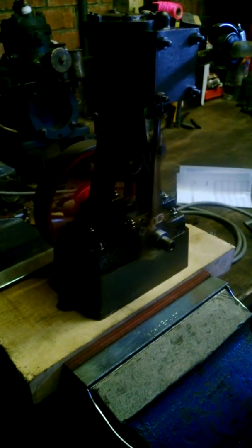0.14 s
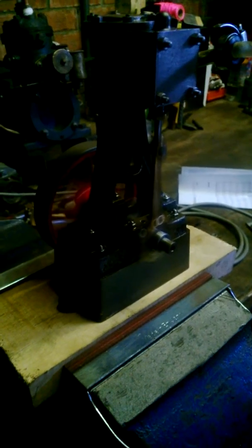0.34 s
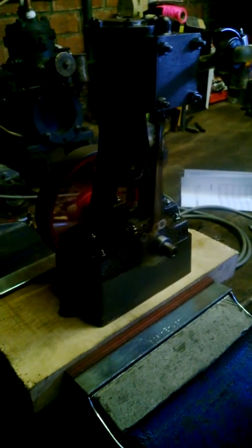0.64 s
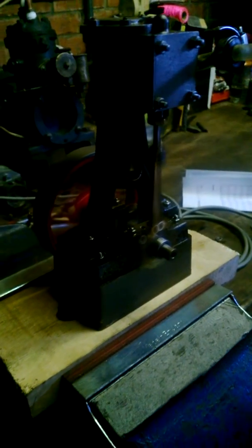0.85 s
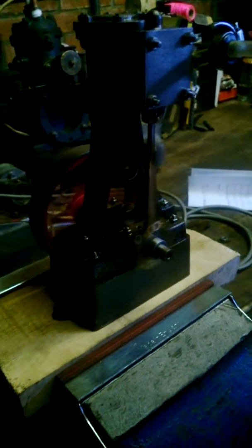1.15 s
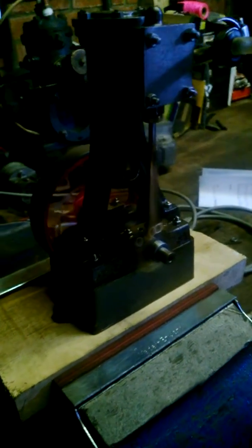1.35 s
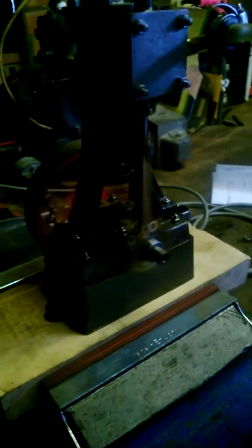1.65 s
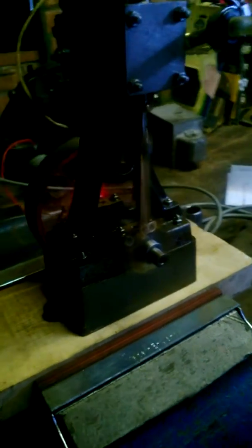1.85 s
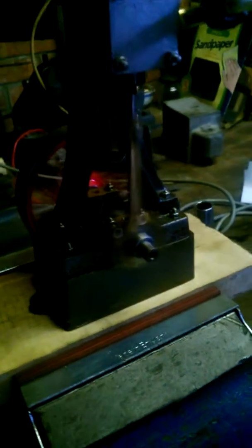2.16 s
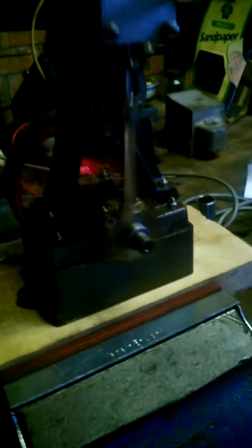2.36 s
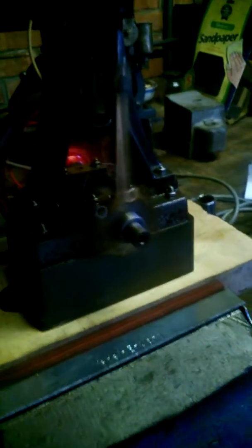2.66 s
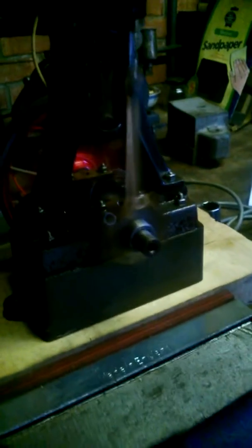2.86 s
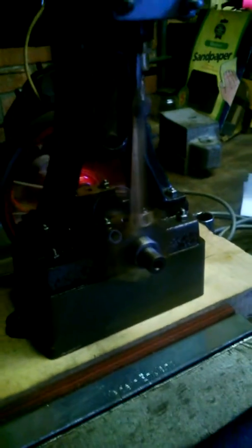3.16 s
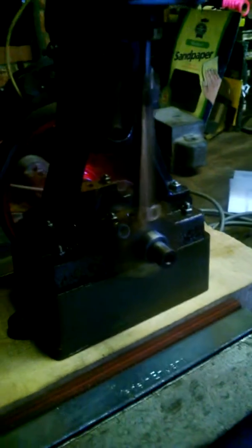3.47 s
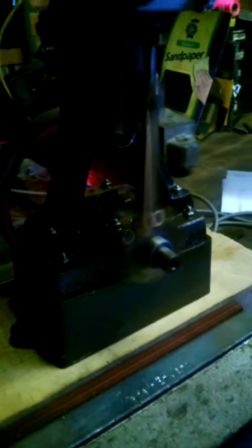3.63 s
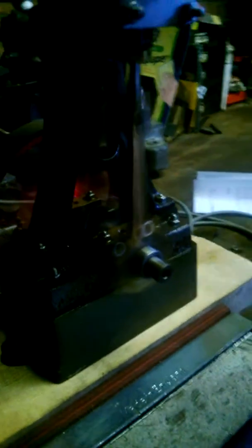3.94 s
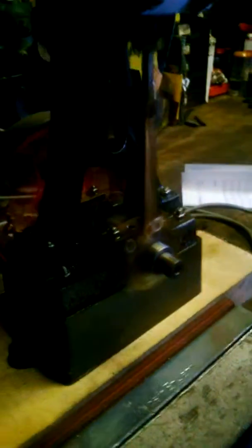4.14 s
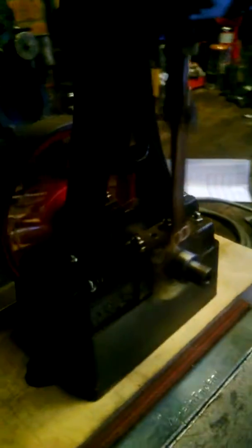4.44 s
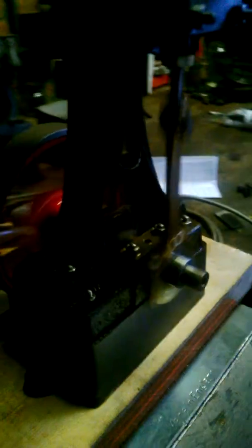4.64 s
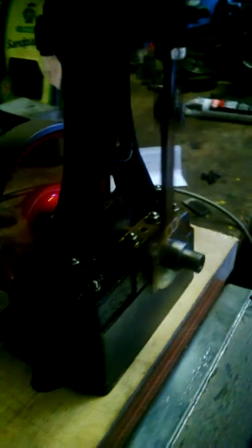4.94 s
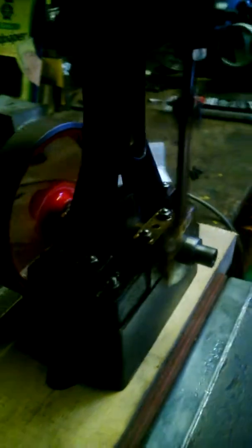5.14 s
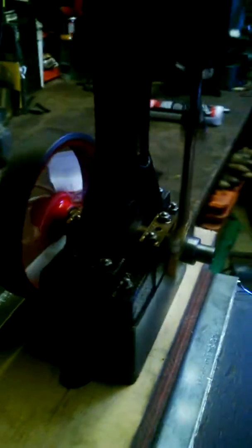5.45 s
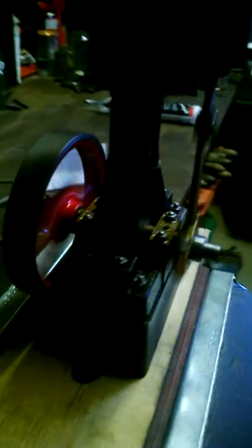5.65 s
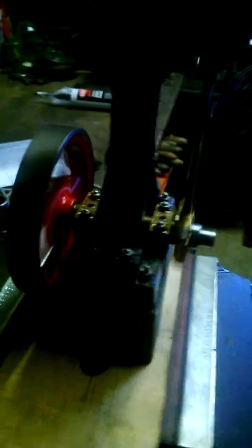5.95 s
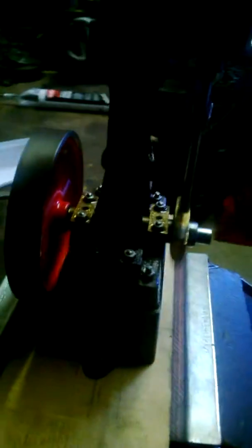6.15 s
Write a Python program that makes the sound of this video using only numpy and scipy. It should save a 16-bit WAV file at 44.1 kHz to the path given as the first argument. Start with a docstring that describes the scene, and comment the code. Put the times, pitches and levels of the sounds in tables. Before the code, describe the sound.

Continuous sharp air hiss, strongest in the high treble, pulses quickly with a small engine's crank. Beneath it are quiet twice-per-turn puffs, a faint bench rumble, soft double ticks and scattered low thuds. The engine is already running and never stops, only easing down in speed. Heard close on a workbench with short reflections, the hiss grows softer and its tone shifts as the microphone moves around.

```python
"""Workshop bench: a small single-cylinder model steam engine runs on compressed air and slowly loses speed.
The leak is coloured noise that throbs and spits with the crank; the exhaust puffs twice a turn and rings the bench.
The microphone moves round the engine, so beaming and echoes recolour the hiss.
Beneath lie a once-a-turn shake, soft double ticks at their own steady pace, low bumps and a noise floor."""
import sys
import numpy as np
from scipy import signal
from scipy.fft import rfft, irfft
from scipy.io import wavfile

SR = 44100
rng = np.random.default_rng(int(sys.argv[2]) if len(sys.argv) > 2 else 0)


def inscribe(sig):
    """Save sig as 16-bit PCM at rate SR to the path in sys.argv[1].

    A 1-D sig is mono; a 2-D sig holds one channel per row.
    Samples are clipped to [-1, 1] before scaling.
    """
    pcm = np.round(np.clip(np.atleast_2d(sig).T, -1, 1) * 32767)
    wavfile.write(sys.argv[1], SR, pcm.astype(np.int16))


N = 277830
TIME = np.arange(N) / SR
FREQS = np.maximum(np.fft.rfftfreq(N, 1 / SR), 1)  # Hz


def run_down():
    """The crankshaft slows, a little faster as the air pressure sinks: turns per second and angle in turns."""
    start_turns_per_s, slowing_turns_per_s2, sag_turns_per_s3 = 36.4888, 0.56836, 0.01167
    speed = start_turns_per_s - slowing_turns_per_s2 * TIME - sag_turns_per_s3 * TIME ** 2
    return speed, np.cumsum(speed) / SR


# jet noise density before levelling: pitch_hz, density_db [dB per Hz, relative]
JET_SPECTRUM = [(450, -38), (900, -28.5), (1400, -22.5), (1800, -21.5), (2500, -18.5), (3100, -16.5),
                (3700, -10.5), (4400, -8.5), (5300, -5.5), (6200, -2), (8000, -7), (10000, -9),
                (13000, -11), (15600, -17)]
# resonances and hollows of cavities round the leak: pitch_hz, width_hz, gain_db
CAVITY_MODES = [(1850, 390, 2), (3050, 250, -1), (3560, 220, 1.5), (3970, 140, 0), (4680, 110, 0.5),
                (5150, 35, 2.5), (5430, 68, 0), (5635, 100, 5), (6040, 90, 2), (6400, 67, 4), (6970, 41, 6),
                (7460, 28, -6), (7390, 27, 2), (7570, 45, 2), (8180, 160, 4), (10300, 50, 3)]


def leak(crank, flutter_db, spit_db, spit_s):
    """Spectrum of a turbulent jet: noise driven by valve pressure and brief spits, coloured by cavities."""
    pressure = from_db(throb(crank) + flutter_db * drift(25))
    strong_spits = each_turn(crank, angle=0.87, scatter=0.056, spread_db=1.5)
    weak_spits = from_db(-6) * each_turn(crank, angle=0.18, scatter=0.08, spread_db=2.5)
    decay = np.exp(-1 / (spit_s * SR))
    spits = from_db(spit_db) * signal.lfilter([1], [1, -decay], strong_spits + weak_spits + 1e-18)
    jet = rng.standard_normal(N) * np.hypot(pressure, spits)
    jet = clutter(jet, close_cut_hz=3100, echo_db=-13.5, small_things_hz=4350,
                  nearest_s=0.0021, farthest_s=0.028, sway_s=0.00005, count=24)
    cavities_db = sum(db / (1 + (2 * (FREQS - hz) / width) ** 2) for hz, width, db in CAVITY_MODES)
    return rfft(jet) * from_db(at_freqs(JET_SPECTRUM) + cavities_db)


# leak pressure dips as each port opens, swells before the turn ends: angle_turns, half_width_turns, pressure_db
VALVE_PRESSURE = [(.005, .06, -3.5), (.49, .055, -3), (.86, 0.1, 2.5)]


def throb(crank):
    """Pressure at the leak in dB, the same dips and swell every turn."""
    def from_angle(angle):
        return (crank - angle + 0.5) % 1 - 0.5  # nearest signed distance, turns
    return sum(db * np.exp(-(from_angle(angle) / width) ** 2) for angle, width, db in VALVE_PRESSURE)


# two close reflections: delay_s, backed_off_added_s, lowered_added_s, level_db, lowered_gain_db,
# bearing_gain_db_per_degree
CLOSE_REFLECTIONS = [(.00098, .00026, 0.000066, -13.5, 6, -0.064),
                     (.001165, .00015, .00011, -10.5, -3, 0.0529)]


def clutter(x, close_cut_hz, echo_db, small_things_hz, nearest_s, farthest_s, sway_s, count):
    """Echoes from bench, tools and walls; their paths change as the microphone moves and comb the hiss."""
    fine = signal.resample_poly(x, 2, 1)  # oversampled for smooth moving delays
    fine_time = np.arange(2 * N) / (2 * SR)

    def delayed(path_s):
        """The sound after a path of changing length."""
        return np.interp(TIME - path_s, fine_time, fine)

    # the close pair, opposite in sign, is dull and carves wandering hollows into the lower hiss
    (first_s, first_gain), (second_s, second_gain) = [reflection(row) for row in CLOSE_REFLECTIONS]
    close = first_gain * delayed(first_s) - second_gain * delayed(second_s)
    close = rfft(close) / np.hypot(1, FREQS / close_cut_hz)
    sideways, forward = drift(0.2), drift(0.2)
    far = np.zeros(N)
    for delay_s in np.geomspace(nearest_s, farthest_s, count) * rng.uniform(0.9, 1.1, count):
        bearing = rng.uniform(0, 2 * np.pi)
        sway = np.cos(bearing) * sideways + np.sin(bearing) * forward
        far += delayed(delay_s + sway_s * sway)
    # small things scatter only the treble
    far = rfft(far) / np.hypot(1, small_things_hz / FREQS)
    return x + irfft(close + from_db(echo_db) * far, N)


def reflection(row):
    """Delay in s and gain of a close reflection, from where the microphone is."""
    delay_s, backed_s, lowered_s, db, lowered_db, db_per_degree = row
    backed, lowered, bearing = microphone()
    path_s = delay_s + backed_s * backed + lowered_s * lowered
    return path_s, from_db(db + lowered_db * lowered + db_per_degree * bearing)


# backs off, dips towards the base, circles the engine: time_s, backed_off_0_1, lowered_0_1, bearing_degrees
MICROPHONE_PATH = [(.4, 0.08, 0, -5), (2.2, 0.7, 0.36, 17), (2.55, 0.78, 1, 6), (3.4, 1, .9, 7),
                   (4.3, 1, 0.6, 23), (5.5, 1, 0.05, 47.5), (6.3, 0.9, 0.05, 67)]


def microphone():
    """Backed-off share, lowered share and bearing in degrees at every sample."""
    return in_time(MICROPHONE_PATH)


# hiss level: time_s, rms_db
LEAK_LEVEL = [(0.1, -18.5), (0.13, -19), (2.44, -22.5), (2.46, -21.5), (4.65, -23.5), (4.89, -25),
              (5.01, -23.5), (6.2, -24)]
# borders between the seven ranges of the jet: edge_hz
RANGE_EDGES_HZ = [2400, 4200, 5400, 7400, 9600, 13200]
# low, mid, body, bright, fizz and top against the core range (between body and bright): level_db,
# backed_off_gain_db, lowered_gain_db, lobe_db [negative: shadow], lobe_bearing_degrees, lobe_half_width_degrees
JET_LOBES = [(-24, 0.63, 2.5, 3, 55, 30), (-13.2, 0.85, 3, -3, 73, 12), (-9, 0.43, 6.5, 2, 52, 24),
             (-4, 0.7, 1, 4, 48, 10), (-8, -2.05, 4, 3.5, 33, 27.5), (-12.5, -.2, 4, -2, 67, 12)]


def beam(jet):
    """Each range of the jet's spectrum is louder or softer with the direction it is heard from."""
    backed, lowered, bearing = microphone()
    ranges_db = []
    for db, backed_db, lowered_db, lobe_db, aim, width in JET_LOBES:
        lobe = lobe_db * np.exp(-((bearing - aim) / width) ** 2)
        ranges_db.append(db + backed_db * backed + lowered_db * lowered + lobe)
    low, mid, body, bright, fizz, top = ranges_db
    gains = [from_db(db) for db in (low, mid, body, 0, bright, fizz, top)]
    above = [1] + [1 / (1 + (edge / FREQS) ** 24) for edge in RANGE_EDGES_HZ] + [0]
    ranges = [rms_one(irfft(jet * (lower - upper), N)) for lower, upper in zip(above, above[1:])]
    heard = sum(gain * part for gain, part in zip(gains, ranges))
    # beaming changes colour only: loudness follows LEAK_LEVEL
    even = heard / np.sqrt(sum(gain ** 2 for gain in gains))
    return from_db(in_time(LEAK_LEVEL)[0]) * rms_one(even)


# exhaust strokes before levelling: angle_turns, relative_db
EXHAUST_STROKES = [(0.046, 5.5), (0.526, 5)]
# bench and base, rung by the puffs: pitch_hz, width_hz, gain_db
BENCH_MODES = [(67.6, 10, -5.5), (149.3, 11.5, 5.5), (198.7, 7.9, -3.5), (271, 13, 0.5), (297, 19, 3),
               (320, 32, -13)]


def exhaust(crank, puff_s, low_cut_hz):
    """Each stroke lets out one short smooth puff, which also rings the base and bench."""
    strokes = sum(from_db(db) * each_turn(crank, angle, scatter=0.0035, spread_db=1.8)
                  for angle, db in EXHAUST_STROKES)
    lag_s = np.arange(-SR // 100, SR // 100 + 1) / SR
    puffs = signal.fftconvolve(strokes, 1 / np.cosh(lag_s / puff_s), "same")
    puffs = signal.sosfilt(signal.butter(1, low_cut_hz, "high", fs=SR, output="sos"), puffs)
    backed, lowered, bearing = microphone()
    level_db = -46 - 2 * backed + 0.9 * lowered - 0.0248 * bearing
    return from_db(level_db) * rms_one(puffs + resonate(puffs, BENCH_MODES))


def shake(crank, speed, level_db, waver_db):
    """The unbalanced crank rocks the bench once a turn, a little unevenly, and harder the faster it spins."""
    force = (speed / speed[0]) ** 2
    return from_db(level_db + waver_db * drift(4)) * force * np.sin(2 * np.pi * crank)


# dull tick resonances: pitch_hz, width_hz, gain_db
TICK_RESONANCES = [(400, 65, -11), (523, 32, 0), (645, 27, 2.5), (683, 29, 2), (846, 51, -8)]


def ticking(level_db, weak_db, spread_db, second_s, second_db):
    """Dull steady ticks, strong and weak in turn, each a double touch, the second nearly as strong."""
    start_s, pair_period_s = 0.040, 0.1324  # a pair is one strong tick, one weak
    beats = np.arange(int(2 * N / SR / pair_period_s))
    chance = rng.uniform(-1.04, 1, (len(beats), 2))
    times = start_s + beats * pair_period_s / 2
    sizes = from_db(weak_db * (beats % 2) + spread_db * chance[:, 0])
    second_times = times + second_s * (1 + 0.2 * chance[:, 1])
    touches = impulses(times, sizes) + from_db(second_db) * impulses(second_times, sizes)
    return from_db(level_db) * rms_one(resonate(touches, TICK_RESONANCES))


# low bumps, timed at their middle: time_s, peak_db, pitch_hz
LOUD_BUMPS = [(.68, -45, 105), (.975, -39, 107), (1.14, -37.5, 108), (2.6, -44, 105), (2.84, -42.5, 104),
              (3.09, -41, 105), (3.72, -43, 105), (4.087, -40, 107), (4.182, -46, 104), (4.297, -44.5, 107),
              (4.39, -43, 108), (4.541, -46, 108), (5.737, -37.5, 96), (5.959, -41.5, 61), (6.211, -39, 97),
              (6.24, -41, 61)]
BUMP_USUAL_HZ = 105


def bumps(faint_per_s, faint_db, spread_db, spread_octaves):
    """Low thuds at set times, and faint ones scattered at random among them."""
    loud = sum(thud(s, db, hz) for s, db, hz in LOUD_BUMPS)
    chance = rng.uniform(-1, 1, (int(faint_per_s * N / SR), 3))
    faint = 0
    for when, size, pitch in chance:
        hz = BUMP_USUAL_HZ * 2 ** (spread_octaves * pitch)
        faint = faint + thud(abs(when) * N / SR, faint_db + spread_db * size, hz)
    return loud + faint


def thud(s, db, hz):
    """A soft low sine that swells and fades within a few cycles; deeper ones last longer."""
    half_s = 0.028 * (BUMP_USUAL_HZ / hz) ** 2
    swell = np.exp(-((TIME - s) / half_s) ** 2)
    return from_db(db) * swell * np.sin(2 * np.pi * (hz * (TIME - s) + rng.random()))


# workshop background before levelling: pitch_hz, density_db [dB per Hz, relative]
ROOM_SPECTRUM = [(20, -14), (45, -8), (80, -5), (110, 1.5), (170, -1.5), (250, -9.5), (400, -11.5),
                 (700, -10), (1000, -15.5), (2200, -27)]


def room(level_db):
    """Steady workshop background: noise, mostly low."""
    return from_db(level_db) * noise(at_freqs(ROOM_SPECTRUM))


def each_turn(crank, angle, scatter, spread_db):
    """An impulse whenever the crank passes an angle; scatter in turns, size spread in dB."""
    turns = np.arange(int(crank[-1]) + 1)
    chance = rng.standard_normal((len(turns), 2))
    times = np.interp(turns + angle + scatter * chance[:, 0], crank, TIME, left=-1, right=-1)
    return impulses(times, from_db(spread_db * np.clip(chance[:, 1], -2.5, 2.5)))


def impulses(times, sizes):
    """One impulse at each time inside the scene."""
    inside = (times >= 0) & (times < (N - 1) / SR)
    return np.bincount((times[inside] * SR).astype(int), sizes[inside], N)


def resonate(x, modes):
    """Parallel two-pole resonances, each with its own peak gain."""
    out = np.zeros(N)
    for hz, width_hz, db in modes:
        r = np.exp(-np.pi * width_hz / SR)
        zeros = np.array([1, 0, -1]) * (1 - r * r) / 2
        poles = [1, -2 * r * np.cos(2 * np.pi * hz / SR), r * r]
        out += from_db(db) * signal.lfilter(zeros, poles, x + 1e-18)
    return out


def noise(spectrum_db):
    """Noise of a given colour and unit power."""
    return rms_one(irfft(rfft(rng.standard_normal(N)) * from_db(spectrum_db), N))


def drift(rate_hz):
    """Slow random wander with spread 1."""
    return noise(-20 * np.log10(1 + (FREQS / rate_hz) ** 2))


def at_freqs(points):
    """A short spectrum in dB, joined on a log-frequency axis."""
    hz, db = np.transpose(points)
    return np.interp(np.log(FREQS), np.log(hz), db)


def in_time(rows):
    """Each column of a curve table at every sample."""
    s, *columns = np.transpose(rows)
    return [np.interp(TIME, s, column) for column in columns]


def rms_one(x):
    """Scale to unit power."""
    return x / np.sqrt(np.mean(x ** 2) + 1e-20)


def from_db(db):
    """Decibels to gain."""
    return 10 ** (np.asarray(db) / 20)


def scene():
    """The crank angle drives hiss, puffs and shake; ticks, bumps and room run free."""
    speed, crank = run_down()
    hiss = beam(leak(crank, flutter_db=0.4, spit_db=3.0, spit_s=0.00056))
    puffs = exhaust(crank, puff_s=0.00041, low_cut_hz=86)
    rocking = shake(crank, speed, level_db=-55.5, waver_db=1.5)
    ticks = ticking(level_db=-58.5, weak_db=-7.0, spread_db=2.0, second_s=0.008, second_db=-2.5)
    thuds = bumps(faint_per_s=2.2, faint_db=-51, spread_db=3, spread_octaves=0.2)
    return (hiss + puffs + rocking + ticks + thuds + room(level_db=-50.0))[None, :]


def record(dry):
    """The top is cut steeply above 15.8 kHz."""
    return signal.sosfilt(signal.ellip(12, 0.1, 90, 15800, fs=SR, output="sos"), dry)


dry = scene()
out = record(dry)
inscribe(out)
```